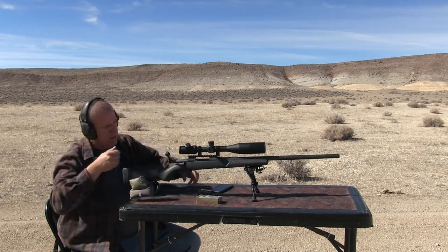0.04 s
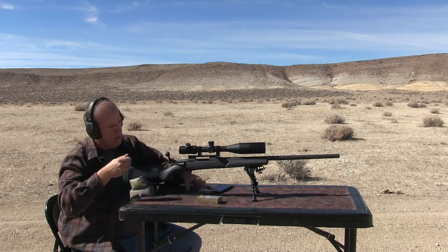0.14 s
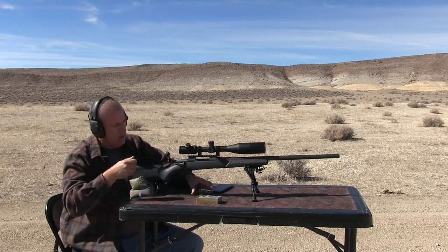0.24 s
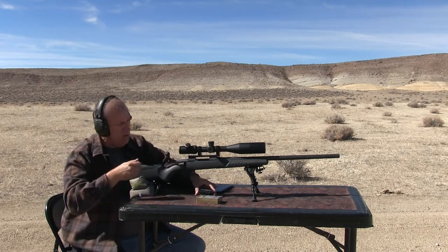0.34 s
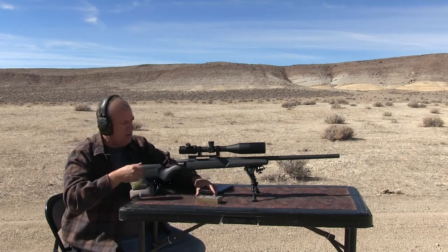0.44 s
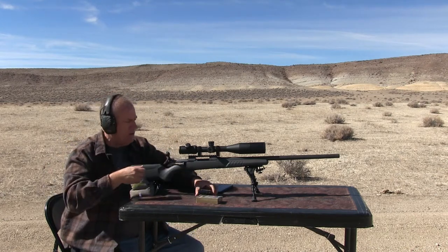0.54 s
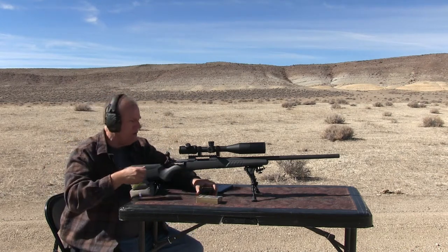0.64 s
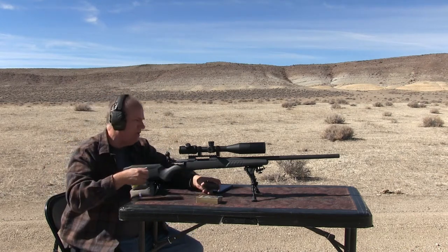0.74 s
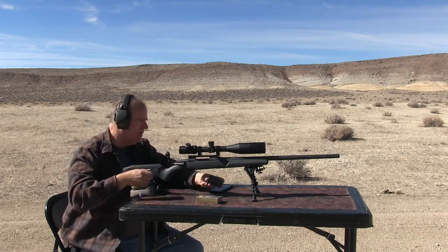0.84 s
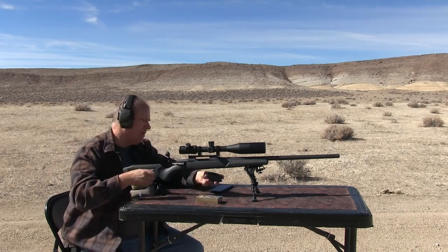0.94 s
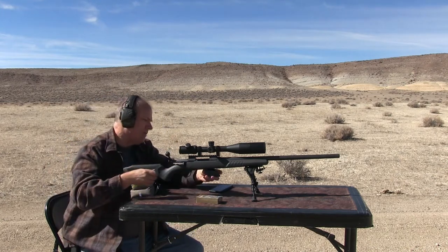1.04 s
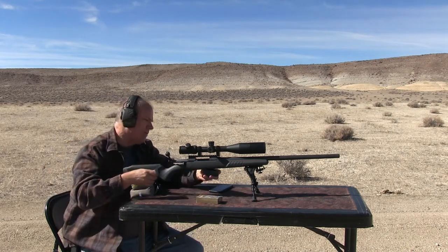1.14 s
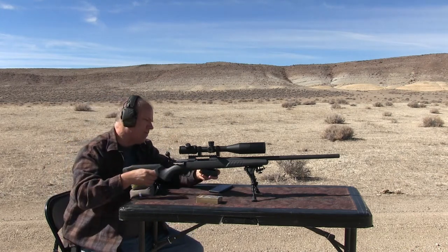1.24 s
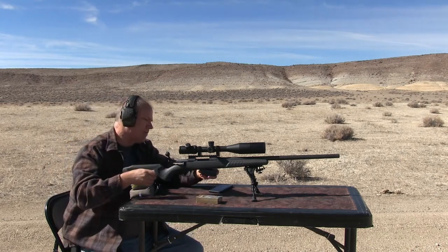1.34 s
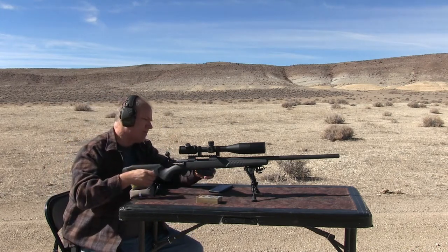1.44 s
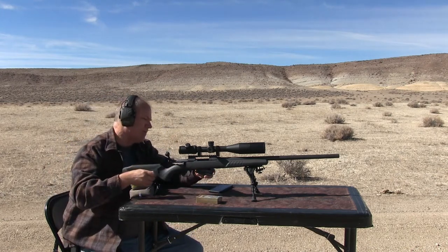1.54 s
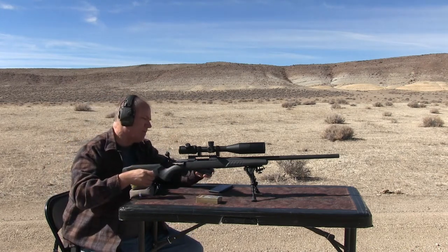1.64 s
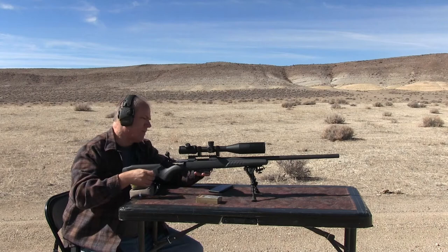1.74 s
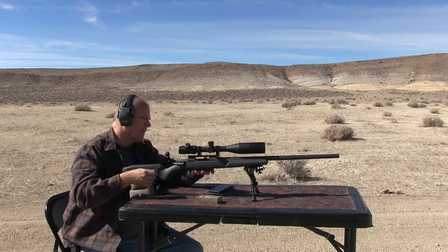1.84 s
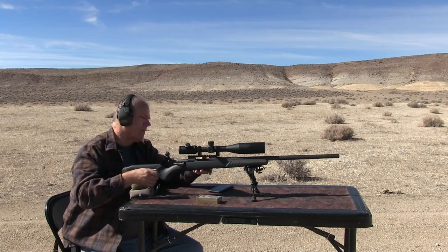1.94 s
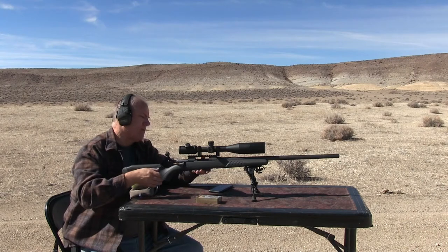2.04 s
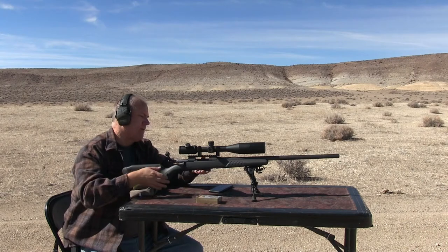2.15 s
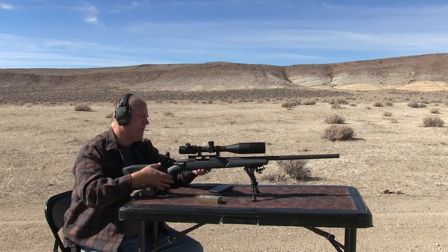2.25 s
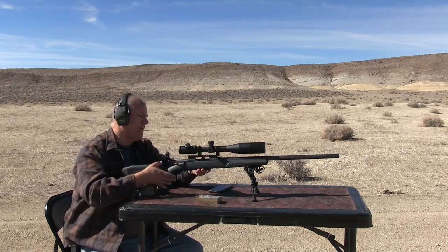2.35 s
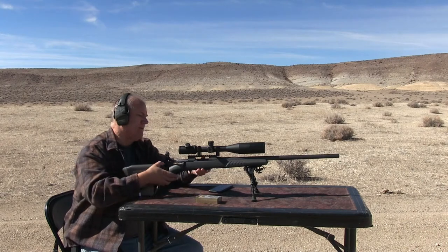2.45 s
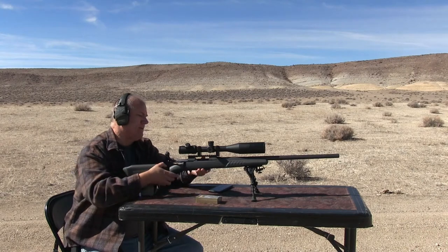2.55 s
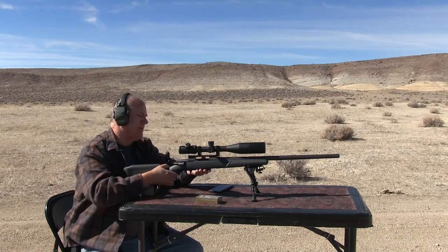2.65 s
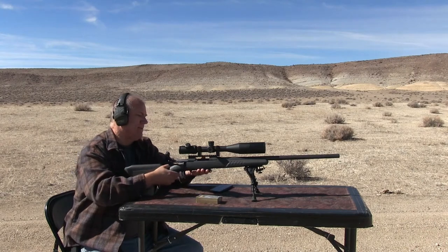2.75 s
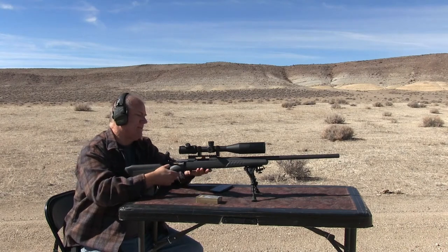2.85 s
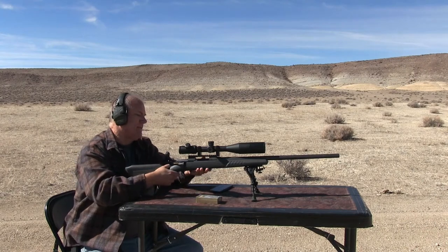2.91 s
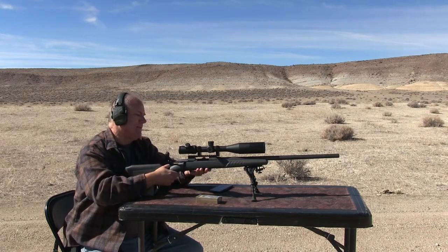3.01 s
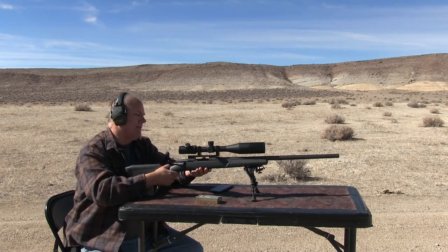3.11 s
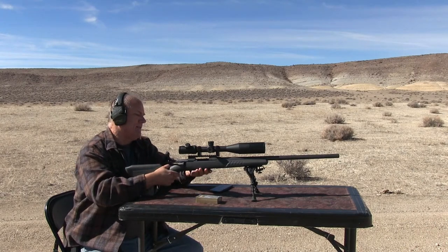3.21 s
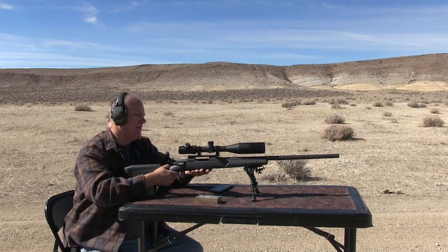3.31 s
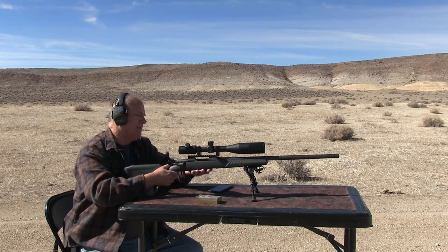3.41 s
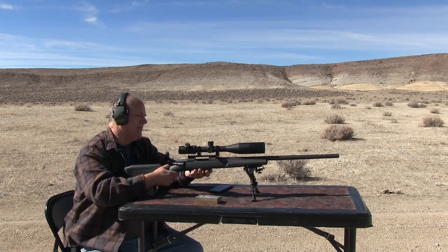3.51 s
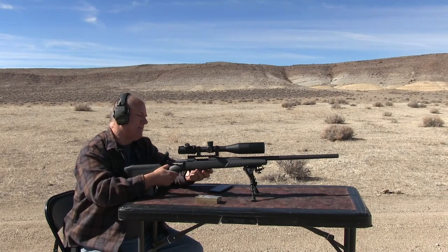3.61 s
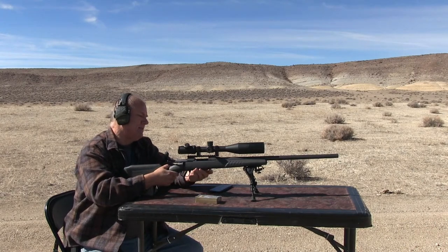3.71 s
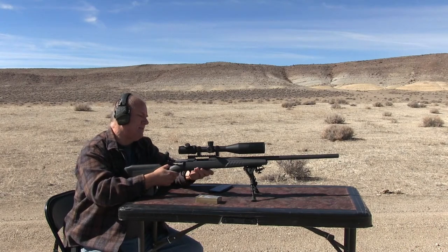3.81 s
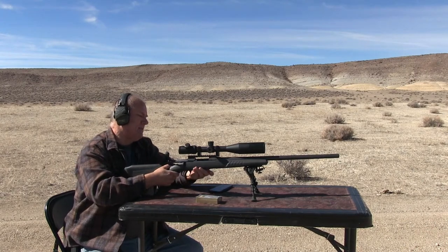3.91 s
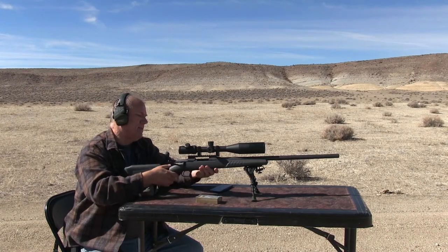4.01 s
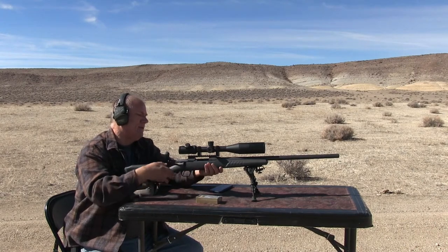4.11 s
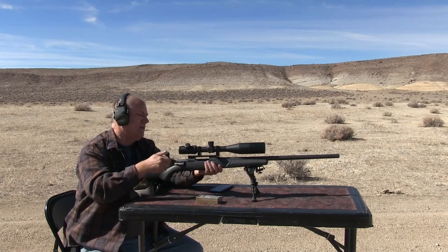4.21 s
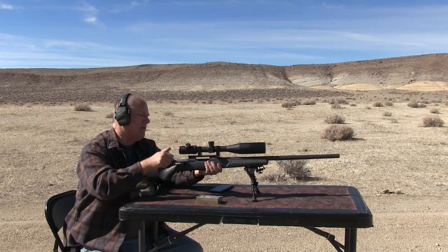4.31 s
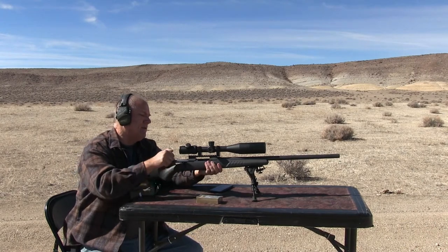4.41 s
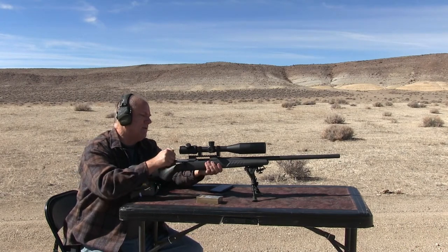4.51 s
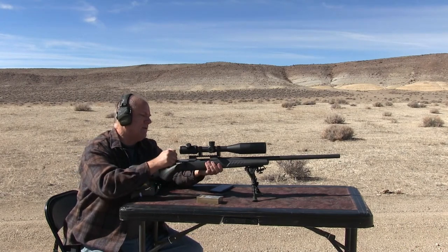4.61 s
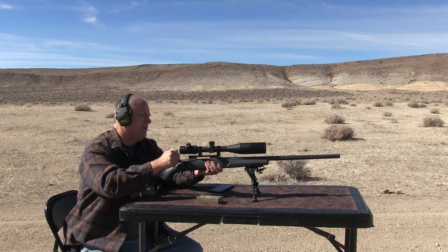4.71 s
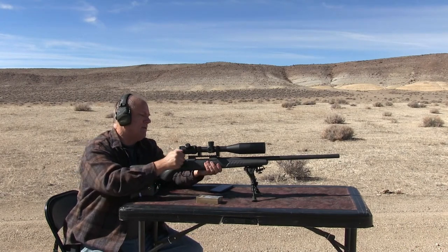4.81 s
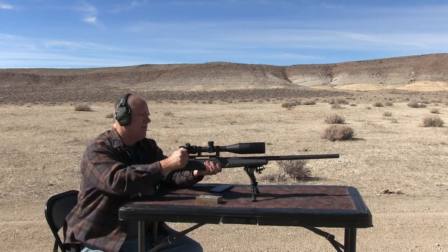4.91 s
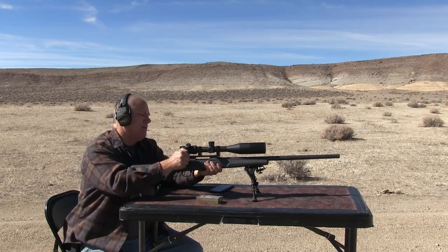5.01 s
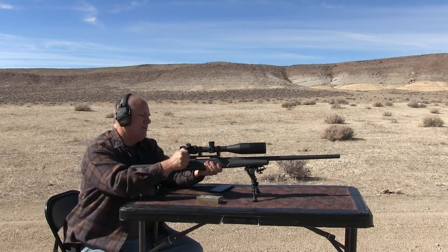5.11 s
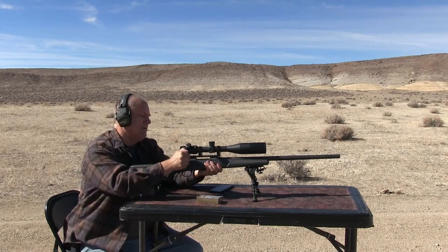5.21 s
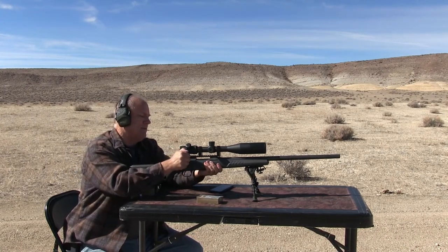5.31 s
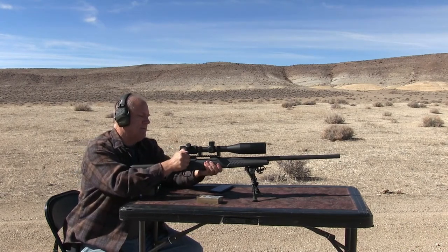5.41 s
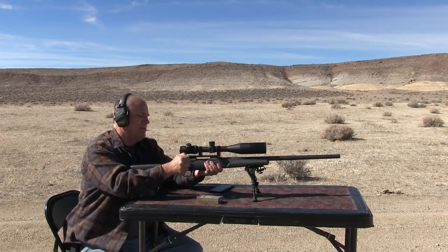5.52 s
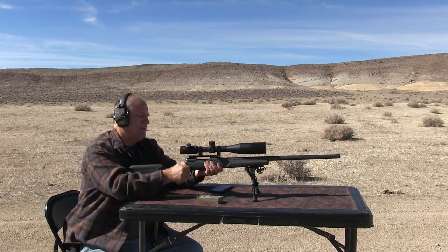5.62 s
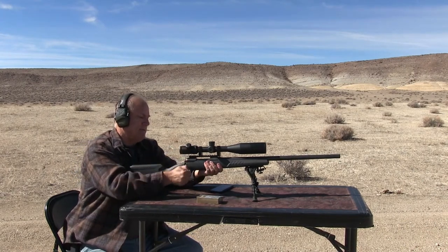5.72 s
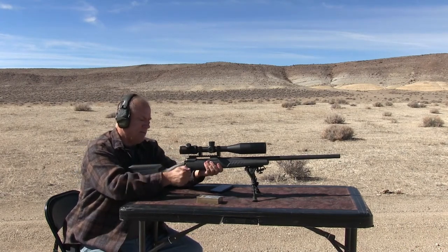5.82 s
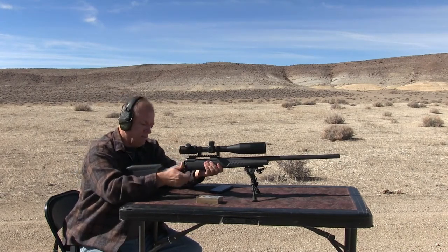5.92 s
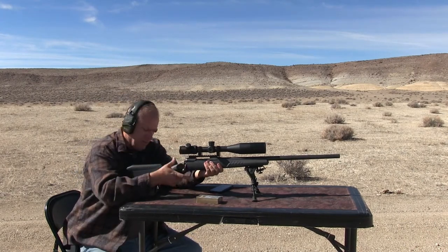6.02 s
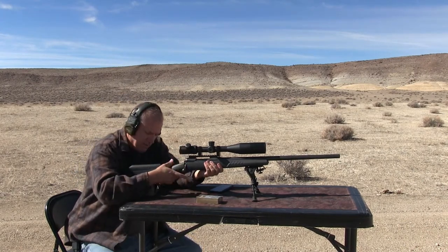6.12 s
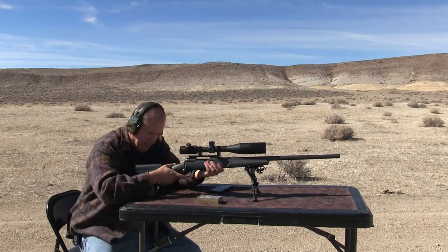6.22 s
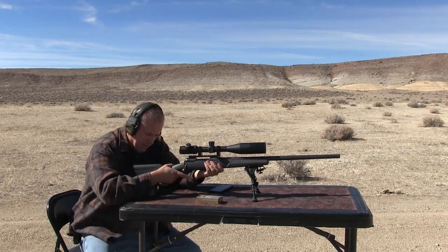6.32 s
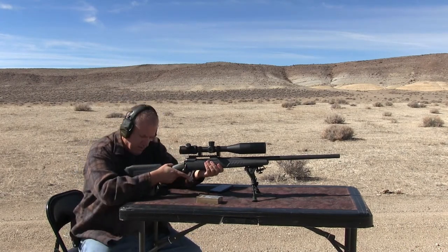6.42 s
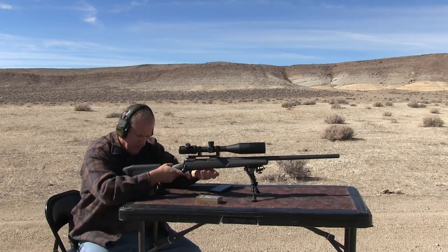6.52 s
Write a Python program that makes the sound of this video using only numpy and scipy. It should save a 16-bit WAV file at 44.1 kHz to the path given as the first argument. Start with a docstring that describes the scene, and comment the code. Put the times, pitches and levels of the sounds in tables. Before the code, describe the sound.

A rifle on a folding table is loaded in open desert, heard from a few metres away. Soft thumps and cloth come first, then a bright click and a cluster of metal clacks as the magazine goes in. One hard snap follows, then a dull table thump, and finally the bolt slides and slams in a fast clatter with a tiny brass ring. Sleeves rustle at the end over light wind and hiss.

```python
"""Open desert, a few metres from a rifle on a folding table: a magazine is loaded and seated, then the bolt is worked.
Clacks and slides are impact trains that excite short modes of steel, action and stock; thin parts ring on.
The table thumps in damped low modes, and scattering off the ground adds one bounce.
Sleeves are shaped noise with crackles; lumpy low wind noise and steady microphone hiss lie under it all."""
import sys
import numpy as np
from scipy import signal
from scipy.io import wavfile
from scipy.ndimage import uniform_filter1d

SR = 44100
rng = np.random.default_rng(int(sys.argv[2]) if len(sys.argv) > 2 else 0)


def store_pcm(level_fs):
    """Save levels as 16-bit WAV."""
    pcm = np.round(np.clip(level_fs, -1, 1) * 32767).astype(np.int16)
    wavfile.write(sys.argv[1], SR, np.atleast_2d(pcm).T)


N = 288987  # samples

# Short modes of each rifle part, t60 held to at least 2 ms: pitch_hz, level_db, t60_s
STEEL = [(4035, 11, 0.0073), (4505, 8.5, 0.014), (4850, 8, 0.0091), (5430, 11, .009), (5710, 7, 0.018),
         (6184, 7, 0.008), (6620, 7, 0.0077), (7022, 6, 0.0066), (6925, -9.5, 0.016), (7740, -5, 0.013)]
EDGE = [(8720, 3.5, 0.0022), (9040, -4, 0.012), (9430, -4.5, 0.0007), (10900, -15, 0.0017)]
STOCK = [(692, -3, 0.022), (935.4, -5.5, 0.0091), (1199.6, 16.5, 0.0077), (1547, 2.5, 0.014),
         (2005, -1, 0.018)]
ACTION = [(2355, 0, 0.0074), (2832, -3.5, 0.016), (3133, -6.5, 0.015), (3420, -4.5, 0.015), (3710, -3, .01)]
# Brightest modes, for the edge of hard blows: pitch_hz, level_db, t60_s
SNAP = [(12200, 0.5, 0.0034), (13100, -7, 0.0017), (15000, -9, 0.0022)]
# Table top under the rifle: pitch_hz, level_db, t60_s
BENCH = [(186, -0.5, 0.017), (268.5, -2.5, .04), (337, 0.5, 0.063), (420, -0.5, 0.09)]


def rifle():
    """Modal superposition: each part responds to its own force with its own dying modes."""
    # lower and upper steel, edge, lower and upper stock, action, snap, bench, hollow of the stock
    parts = STEEL[:5], STEEL[5:], EDGE, STOCK[:3], STOCK[3:], ACTION, SNAP, BENCH, STOCK[:1]
    forces = clack_forces() + slide_forces() + tick_forces()
    return sum(ring(modes, force) for modes, force in zip(parts, forces))


CHATTER_T60_S, CHATTER_DB_PER_EDGE = 0.011, 0.0134  # a sharper edge very slightly lengthens the chatter
SNAP_DB, SNAP_PER_EDGE, SNAP_PER_FORCE = -12, 1.8, 0.45  # snap over steel grows with edge and force
BENCH_DB = -19.5  # what reaches the table, relative to the stock
# Blows of metal on metal: start_s, steel level_db; stock_db, action_db and edge_db relative to steel;
# steel_tilt_db and stock_tilt_db, upper over lower modes
CLACKS = [(0.1508, -51, 0, -1, -13, 1, -4), (0.3725, -51.5, -22, -17, -7, 6, -2),
          (0.9466, -49, -4, -14, -7, 1, -10), (0.999, -53, 0.5, -12, -15, -1, 13),
          (1.2222, -57, -14, -12, 1, 6, -4), (1.2594, -14.5, -19, -11.5, -14, 6.5, -4),
          (1.2903, -49, -10, 7, -6, 1, -5), (1.319, -36.5, -13, -10, -20, 0, 5),
          (1.36, -51, -15, 2, -14, 0, -4), (1.3732, -34, -3.5, -0.5, -18, 1, 1),
          (1.42, -54, -16, -11, -6, -10, -7), (1.4431, -51, 12.5, 9.5, -8, -3, -2),
          (1.492, -60, -18, -11, -11, -3, -3), (1.545, -32, -16.5, -4.5, -10.5, 4, -2),
          (1.5563, -47, -13, -8, -13, -1, -12), (1.5933, -49, 14, -7, -32, -4, -5),
          (1.6018, -41, 9, 3, -14, 4, -11), (1.6113, -49.5, 8, -10, -17, -3, 11),
          (1.6285, -46.5, 6.5, -11, -11, -4, 1), (1.7103, -34.5, -23, -5, -8.5, 0, -1),
          (1.845, -16.5, -10.5, -11, -18.5, 1, -6), (1.8541, -30, 1, -4, -29, 0, -5),
          (1.9389, -21.5, -1, -3.5, -20, 1, 0), (2.0024, -23, 1.5, -2, -26, -4.5, -4.5),
          (2.008, -22.5, -3.5, -0.5, -11, 0, 1), (2.0163, -12.5, -2, 0, -21, -1.5, -3),
          (2.046, -44, 2, 5, -12, 4, -12.5), (2.07, -25.5, -10, -2, -7, 10, 4),
          (2.0767, -25.5, -1, -1, -27, -1, 7), (2.0857, -18, -5.5, -2, -12.5, -1, -9.5),
          (2.0907, -23, 0, -1, -13, -2, -4), (2.0952, -24, -3.5, -11, -11, 1, -2),
          (2.1001, -23.5, -7, 0, -12, 0, 3), (2.1084, -37, -2, -14, -21, 0, -6),
          (2.19, -57, -21, -24, 2, 9.5, -16.5), (2.233, -49.5, -10, -23, -3, -4, -14),
          (2.327, -62.5, 10.5, 1, -5, 14, -21), (2.8948, -67.5, 9, 6, -10, -11, -12),
          (3.0732, -50.5, 6, -1, -9, -3, -3.5), (3.0877, -6, -8, -2.5, -8.5, -1, 11.5),
          (3.0939, -17.5, -20, -2, -9, -3.5, -8), (3.3057, -39.5, -4.5, -2, -15, -3.5, 1.5),
          (3.396, -60.5, -15, 1, -15.5, 10, -14), (3.5951, -69, 7, 4, -8.5, 7.5, -10),
          (3.76, -54.5, 6, 5.5, 7, -5, 0), (3.7872, -53, -17, -2, -4, -1, -9),
          (4.0165, -50, -23, -10.5, -8, -10, -5.5), (4.6457, -29, -7.5, -4.5, -14.5, -0.5, 0.5),
          (4.663, -44, 1.5, 1.5, -23.5, -7.5, 3), (4.6746, -53, -2, 3, -26, -5, -11),
          (4.825, -50, 2.5, 9, -23, -8.5, -3), (4.8481, -30.5, -5, -2, -14.5, 2, 8),
          (4.855, -48, 6.5, 9, -28, -10.5, -7), (4.9629, -25, -10.5, -3, -14, -6.5, -11.5),
          (4.9803, -12, -17, -0.5, -12, 3.5, -1), (4.9837, -9.5, -13.5, -9.5, -20.5, 5, 2),
          (4.9859, -8, -18.5, -13, -19, 7, 4), (4.9975, -23.5, -14, -0.5, -18.5, -11.5, 14),
          (5.0115, -21.5, -17.5, -3.5, -13.5, -7, 8), (5.0191, -28, -13, -9, -19.5, -1, -0.5),
          (5.0421, -27.5, -9.5, -8, -29, -2, 15.5), (5.051, -29, -23.5, -6.5, -24.5, -6.5, -1),
          (5.0583, -32, -15, 2, -26, -11.5, 2), (5.0614, -36, -12, -9, -27, -14, -5.5),
          (5.069, -18.5, -4, -23.5, -28, 4, -12.5), (5.0712, -17.5, -12.5, -7.5, -25, -3, 2.5),
          (5.135, -56.5, -13, 0.5, -16, -18.5, 1), (5.3106, -39.5, 1, -2, -18, -4.5, 3.5),
          (5.3137, -26.5, -8.5, -4.5, -12.5, -12.5, 0), (5.4953, -61.5, -7.5, -8.5, -13, -6, -12),
          (5.5588, -63, 7, 4, -13, 2.5, 2), (5.6805, -54.5, 0.5, -10, -10.5, -4, -15.5),
          (5.701, -31.5, -4.5, 0, -5, -7, 6), (5.7057, -29, -18.5, 1, -21, -3, -4),
          (5.7137, -37, -1, 1, 0, 13, 8), (5.7183, -29.5, -5, -7, -23, -1, -5),
          (5.883, -25, 7, 5, -12.5, -13, 0.5), (6.3304, -48, -14, -12, -17, 9, -13),
          (6.447, -47, -9, 0, -12, -1, 0)]


def clack_forces():
    """Impulsive excitation: a first contact, then rebounds that die exponentially."""
    forces = np.zeros((9, N))
    t = np.arange(2000) / SR
    for s, db, stock, action, edge, tilt, stock_tilt in CLACKS:
        impacts = first_contact_and_rebounds(len(t))
        t60 = CHATTER_T60_S * amp(CHATTER_DB_PER_EDGE * (edge + 9))
        decay = amp(-60 * t / t60)
        burst = impacts * decay
        burst *= np.linalg.norm(decay) / np.linalg.norm(burst)  # random energy made even
        snap = SNAP_DB + SNAP_PER_EDGE * edge + SNAP_PER_FORCE * db
        steel_db = [-tilt / 2, tilt / 2]
        stock_db = [stock - stock_tilt / 2, stock + stock_tilt / 2]
        shares_db = np.array([*steel_db, edge, *stock_db, action, snap, stock + BENCH_DB])
        add(forces[:8], s, amp(db + shares_db)[:, None] * burst)
    return forces


SLIDE_ACTION_DB = -2.5  # relative to the slide force
SLIDE_HOLLOW_DB = -4.5  # lowest stock mode, relative to the slide's stock level
# Metal sliding on metal, before each part's share: start_s, end_s, start_level_db, end_level_db,
# stock_db relative to the slide force
SLIDES = [(1.251, 1.331, -66, -56.5, -9), (1.524, 1.539, -62, -57, -11), (1.547, 1.6, -52.5, -64, -9),
          (1.589, 1.636, -46.5, -59.5, 1.5), (1.641, 1.651, -60, -73, 7), (1.843, 1.95, -51, -43.5, -0.5),
          (1.973, 2.001, -59, -51, 11.5), (2.05, 2.075, -65.5, -40.5, 7.5), (3.857, 3.895, -53, -64, -3),
          (4.789, 4.843, -69.5, -55, -7), (4.94, 4.987, -63, -30, -9), (5.018, 5.041, -37, -53.5, -6),
          (5.046, 5.068, -37, -47, 0)]


def slide_forces():
    """Friction excitation: asperities in sliding contact give a dense train of tiny impacts."""
    forces = np.zeros((9, N))
    scrape = grains(per_s=6000, spread_db=7.5)
    for start, end, start_db, end_db, stock in SLIDES:
        size = round((end - start) * SR)
        level = signal.windows.tukey(size, 0.15) * amp(np.linspace(start_db, end_db, size))
        force = level * scrape[round(start * SR):][:size]
        shares_db = [-3.5, -3.0, -14.0, stock - 1.5, stock - 14.0, SLIDE_ACTION_DB]
        add(forces[:6], start, amp(shares_db)[:, None] * force)
        add(forces[8], start, amp(stock + SLIDE_HOLLOW_DB) * force)
    return forces


TICKS_PER_S, TICKS_DB = 7, -33  # level relative to the sleeve swish, before each part's share


def tick_forces():
    """Sparse random excitation: stray handling impacts, stronger where the sleeves swish more."""
    forces = np.zeros((9, N))
    t = np.arange(2000) / SR
    ticks = amp(TICKS_DB + curve(RUSTLE)[0]) * grains(per_s=TICKS_PER_S, spread_db=0.0)
    burst = first_contact_and_rebounds(len(t)) * amp(-60 * t / CHATTER_T60_S)
    shares = amp([[0], [0], [-11.0], [-6.0], [-11.0], [-4.0]])
    forces[:6] = shares * signal.oaconvolve(ticks, burst)[:N]
    return forces


# Lightly damped modes of brass case, barrel, magazine and a thin low ring: pitch_hz, level_db, t60_s
CASE = [(7025, -8, .055), (7138, 0, .05)]
BARREL = [(2418, 0, .3), (1454, -10, .3)]
MAGAZINE = [(2503, 0, .22), (641, -4, .25), (910, -4, .15)]
FAINT_RING = [(891, 0, 0.19)]
# Blows that set each of them ringing: start_s, level_db
CASE_KNOCKS = [(4.998, -38), (5.016, -12), (5.046, -28), (5.049, -31)]
BARREL_KNOCKS = [(2.102, -60), (3.089, -58)]
MAGAZINE_KNOCKS = [(1.556, -55.5), (1.63, -60.5), (1.94, -46.5), (4.998, -39)]
FAINT_RING_KNOCKS = [(2.186, -61.5), (3.857, -54)]


def thin_parts():
    """Free vibration: lightly damped parts ring on as exponentially decaying sines after a blow."""
    t = np.arange(SR // 2) / SR
    out = np.zeros(N)
    struck = [(CASE, CASE_KNOCKS), (BARREL, BARREL_KNOCKS),
              (MAGAZINE, MAGAZINE_KNOCKS), (FAINT_RING, FAINT_RING_KNOCKS)]
    for modes, knocks in struck:
        tone = sum(amp(db - 60 * t / t60) * np.sin(2 * np.pi * hz * t) for hz, db, t60 in modes)
        onset = np.minimum(t / 0.00027, 1)
        for s, db in knocks:
            add(out, s, amp(db) * tone * onset)
    return out


RATTLE_DB = -14.5  # relative to the thump
# Modes of the table: multiple of the pitch, level_db
TABLE = [(0.999, -2.5), (1.7, -6), (2.902, -9), (4.6, -15.5)]
# Thumps through the table: start_s, level_db, pitch_hz, t60_s
THUMPS = [(0.066, -40.5, 87, 0.2), (0.116, -37, 110, .04), (0.158, -27, 278, 0.019), (0.162, -41, 89, .13),
          (0.419, -44.5, 182, 0.13), (0.586, -43.5, 330, 0.05), (1.262, -33, 74, 0.15),
          (1.375, -39.5, 373, 0.099), (1.38, -45, 63, 0.32), (1.446, -46.5, 292, 0.092),
          (1.75, -52.5, 644, .036), (2.02, -41, 75, .15), (2.093, -39.5, 132, 0.14),
          (3.094, -26.5, 86.8, 0.11), (3.598, -51, 690, .05), (3.855, -28, 195, .06),
          (3.861, -17, 108.3, 0.056), (3.874, -43.5, 312, .036), (3.880, -35, 104.5, 0.14),
          (4.038, -44, 150.2, 0.18), (4.409, -36.5, 88, .11), (4.54, -41, 111.8, 0.11),
          (4.697, -39, 214, 0.055), (4.988, -37.5, 378, 0.12), (5.07, -26.5, 397, 0.048),
          (5.315, -39, 487, .05), (5.32, -40.5, 134.4, .09), (5.72, -42, 405, .04), (5.736, -47, 80, .15),
          (5.884, -20, 548, 0.028), (5.889, -29, 59.3, 0.11), (5.9, -37, 202, 0.095),
          (6.259, -38.5, 138, 0.2)]


def table():
    """Damped plate response: a push on the plastic top starts a few low modes softly, with a short rattle."""
    t = np.arange(12000) / SR
    out = np.zeros(N)
    rattles = band(rng.standard_normal((len(THUMPS), len(t))), 340, 710, order=2)
    for (s, db, hz, t60), x in zip(THUMPS, rattles):
        # higher modes die sooner
        modes = sum(amp(d - 60 * t * np.sqrt(k) / t60) * np.sin(2 * np.pi * hz * k * t) for k, d in TABLE)
        rattle = amp(RATTLE_DB - 60 * t / (0.86 * t60)) * unit_rms(x)
        onset = 1 - np.exp(-t * hz / 0.41)
        add(out, s, amp(db) * (modes + rattle) * onset)
    return out


def ground_bounce(gun):
    """Rough-surface reflection: the sand returns one weak, delayed and smeared copy."""
    return amp(-28.5) * scattered(gun, 0.011)


STROKE_LEAN = 0.54  # under 1: quick rise, slower fall
# Sleeves and hands: start_s, treble swish level_db, dull rub level_db
RUSTLE = [(0.0, -57.5, -57.5), (0.2, -66, -66), (0.71, -68, -66), (0.82, -62, -59), (1.0, -59, -57),
          (1.3, -66, -68), (1.7, -75, -75), (1.98, -66.5, -70.5), (2.28, -76.5, -72), (2.6, -62.5, -71),
          (2.96, -63, -65.5), (3.4, -74, -74.5), (3.95, -71.5, -74.5), (4.22, -56, -58.5), (4.45, -63, -64),
          (4.52, -72, -69), (4.72, -70, -70.5), (5.03, -59, -63), (5.3, -74.5, -74), (5.89, -70, -66.5),
          (6.13, -58.5, -60), (6.28, -55, -48), (6.4, -58.5, -52), (6.55, -57.5, -52.5)]
# Short strokes of a hand over cloth or stock: start_s, length_s, peak pressure level_db
STROKES = [(0.388, 0.078, -59.5), (0.638, 0.077, -59.5), (.71, 0.1, -59.5), (2.229, 0.047, -61.5),
           (2.258, 0.19, -66.5), (2.435, 0.12, -60), (2.707, 0.041, -70), (2.79, 0.15, -66),
           (2.95, 0.042, -78), (3.39, 0.078, -66), (3.69, 0.079, -63), (3.838, 0.06, -60.5),
           (4.12, 0.17, -63), (4.349, 0.04, -61.5), (4.412, 0.061, -67.5), (5.483, 0.032, -66),
           (5.66, .06, -66.5), (5.713, 0.3, -61), (6.119, 0.14, -55.5), (6.227, 0.19, -50.5)]
# Relative spectra of swish, rub and stroke: frequency_hz, level_db per Hz
SWISH = [(1350, -26.5), (2300, -5.5), (2560, -2.5), (2780, -4), (4720, -1.5), (6780, -1.5), (8310, -9),
         (11200, -22), (14000, -20.5)]
RUB = [(250, -6.5), (450, -0.5), (800, -2.5), (1300, -6), (2050, -7.5), (2500, -13), (3200, -43)]
STROKE = [(2800, -2), (3800, 1), (5000, 6.5), (7500, 3.5), (9500, -5), (12000, -26.5)]


def sleeves():
    """Friction noise: cloth gives coloured random noise, modulated by fibre crackles common to all bands."""
    swish_db, rub_db = curve(RUSTLE)
    crackle = 1.5 + 0.9 * uniform_filter1d(abs(grains(per_s=75, spread_db=5.0)), 100)
    pressure = np.zeros(N)
    for s, length, db in STROKES:
        phase = np.linspace(0, 1, round(length * SR)) ** STROKE_LEAN
        add(pressure, s, amp(db) * np.sin(np.pi * phase))
    swish = amp(swish_db) * noise(SWISH, patchy_db=2.0)
    rub = amp(rub_db) * noise(RUB, patchy_db=3.0)
    strokes = pressure * noise(STROKE, patchy_db=3.0)
    return unit_rms(crackle) * (swish + rub + strokes)


# Wind at the microphone: start_s, 22-71 Hz level_db, 90-244 Hz level_db
WIND = [(0.0, -53.5, -57), (0.22, -67, -68), (0.84, -63.5, -63.5), (1.12, -68.5, -61.5),
        (1.35, -57.5, -66.5), (1.64, -62, -67), (2.04, -66.5, -63.5), (2.75, -68.5, -69.5),
        (3.19, -63, -57), (3.52, -72, -63), (3.95, -55, -61), (4.27, -67.5, -65.5), (4.55, -62.5, -60),
        (5.05, -56.5, -63), (5.28, -59, -66), (5.69, -66, -69.5), (6.38, -52, -53), (6.55, -65, -55.5)]


def wind():
    """Turbulent pressure noise: two low bands whose level wanders in slow lumps."""
    out = np.zeros(N)
    for db, (lo_hz, hi_hz) in zip(curve(WIND), ((22, 71), (90, 244))):
        lumps = unit_rms(uniform_filter1d(uniform_filter1d(rng.standard_normal(N), 2500), 2500))
        out += amp(db + 1.1 * lumps) * unit_rms(band(rng.standard_normal(N), lo_hz, hi_hz, order=2))
    return out


HISS_DB, SIDE_DB = -73.5, -73.5  # common hiss, and hiss opposite in the two channels
# Relative spectra of common and opposite hiss: frequency_hz, level_db per Hz
HISS = [(180, -37.5), (300, -0.5), (694, -8), (923, -9.5), (1070, -17), (3030, -16.5), (6450, -14),
        (10700, -13.5), (15200, -13), (16500, -40)]
SIDE_HISS = [(200, -1), (600, -2), (3000, -8), (8000, -6.5), (15500, -7), (16500, -39.5)]


def hiss():
    """Stationary random noise: microphone hiss as a common part and a part of opposite sign."""
    return amp(HISS_DB) * noise(HISS), amp(SIDE_DB) * noise(SIDE_HISS)


def amp(db):
    """Decibel law: 20 dB is a factor of ten in amplitude."""
    return 10 ** (np.asarray(db) / 20)


def unit_rms(x):
    """Normalisation by mean power."""
    return x / np.sqrt(np.mean(x ** 2) + 1e-20)


def curve(rows):
    """Linear interpolation of a table's columns at every sample."""
    s, *columns = np.transpose(rows)
    return [np.interp(np.arange(N) / SR, s, c) for c in columns]


def add(mix, s, sound):
    """Superposition of a sound into the mix from s seconds on."""
    part = mix[..., round(s * SR):][..., :sound.shape[-1]]
    part += sound[..., :part.shape[-1]]


def band(x, lo_hz, hi_hz, order=4):
    """Band-pass filtering."""
    edges = lo_hz, min(hi_hz, SR / 2.2)
    return signal.sosfilt(signal.butter(order, edges, "bandpass", fs=SR, output="sos"), x)


def ring(modes, drive):
    """Convolution of a force with a modal impulse response of energy 1; little radiates outside the modes."""
    t = np.arange(SR // 2) / SR
    body = np.zeros(len(t))
    for k, (hz, db, t60) in enumerate(modes):
        sign = (-1) ** k
        body += sign * amp(db - 60 * t / max(t60, 0.002)) * np.sin(2 * np.pi * hz * t)
    body = band(body, 0.73 * modes[0][0], 1.15 * modes[-1][0], order=6)
    return signal.oaconvolve(drive, body / np.linalg.norm(body))[:N]


def first_contact_and_rebounds(size):
    """Random impact strengths, with one strong first contact."""
    impacts = rng.standard_normal(size)
    impacts[4] = 4.8
    return impacts


def grains(per_s, spread_db):
    """Random point process: a train of tiny impacts, a few of them large, rms 1."""
    size = amp(spread_db * np.minimum(rng.exponential(1, N), 4)) * rng.choice([-1.0, 1.0], N)
    return unit_rms(size * (rng.random(N) < per_s / SR))


def noise(points, patchy_db=0.0):
    """Spectral shaping: random short-time spectra with drifting patches, rms 1."""
    hz = np.fft.rfftfreq(512, 1 / SR)
    a, b, patches = rng.standard_normal((N // 128 + 5, 257, 3)).T
    patches = unit_rms(uniform_filter1d(uniform_filter1d(patches, 14, 0), 10, 1))
    f, db = np.transpose(points)
    colour = np.interp(np.log(hz + 1), np.log(f), db, left=-80, right=-80)
    spectra = (a + 1j * b) * amp(colour[:, None] + patchy_db * patches)
    return unit_rms(signal.istft(spectra, nperseg=512, noverlap=384)[1][:N])


def scattered(x, delay_s):
    """Diffuse reflection: convolution with a short dying noise burst of energy 1."""
    t = np.arange(250) / SR
    smear = rng.standard_normal(len(t)) * np.exp(-t / 0.001)
    bounce = np.r_[np.zeros(round(delay_s * SR)), smear]
    return signal.oaconvolve(x, bounce / np.linalg.norm(bounce))[:N]


def scene():
    """Superposition of all sources, nearly mono: a strong common signal and a weak side signal."""
    gun = rifle() + thin_parts()
    soft = table() + sleeves() + wind()
    common_hiss, side_hiss = hiss()
    mid = gun + ground_bounce(gun) + soft + common_hiss
    gun_width = amp(-46.0) * scattered(gun, 0.0002)
    soft_width = amp(-34.5) * np.roll(soft, 3000)  # shifted 68 ms, wrapping round the end
    side = side_hiss + gun_width + soft_width
    return np.array([mid + side, mid - side])


def record(dry):
    """Saturation and band limiting: the loudest peaks bend towards a ceiling, then a 16 kHz low-pass."""
    knee, ceiling = 0.7, 0.9
    room = ceiling - knee
    over = np.maximum(abs(dry) - knee, 0)
    soft = dry - np.sign(dry) * (over - room * np.tanh(over / room))
    low_pass = signal.firwin(511, 16000, window=("kaiser", 9), fs=SR)
    return signal.oaconvolve(soft, low_pass[None], "same")


dry = scene()
out = record(dry)
store_pcm(out)
```